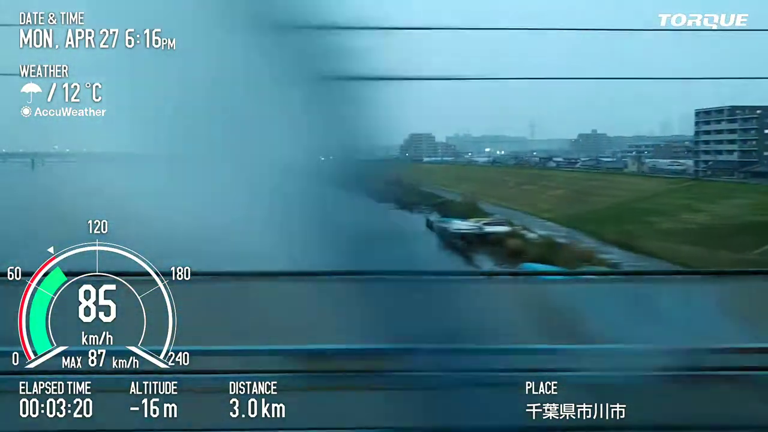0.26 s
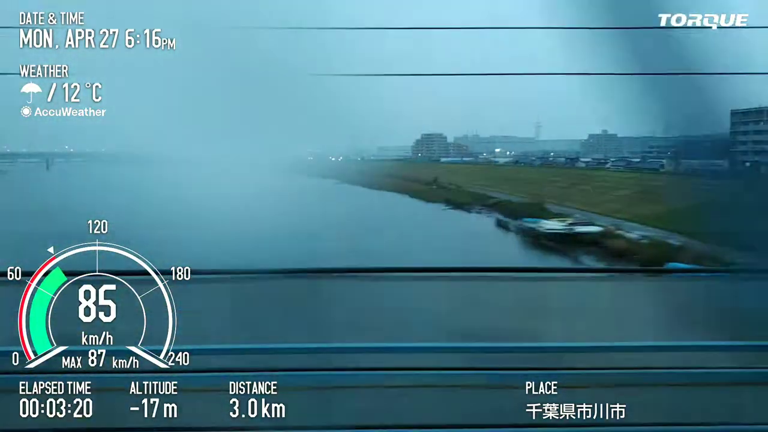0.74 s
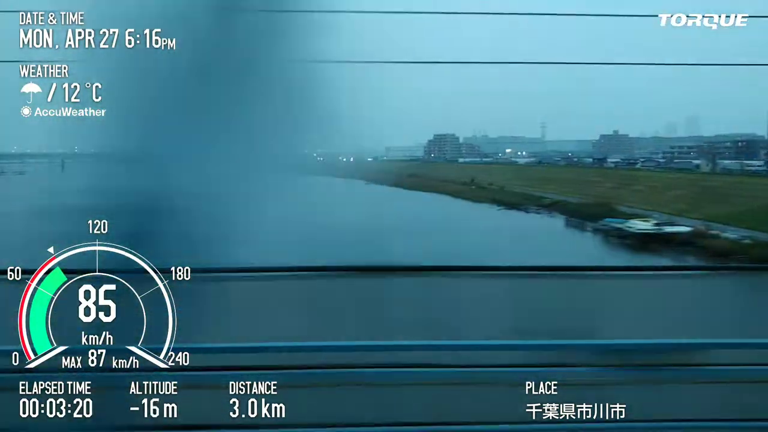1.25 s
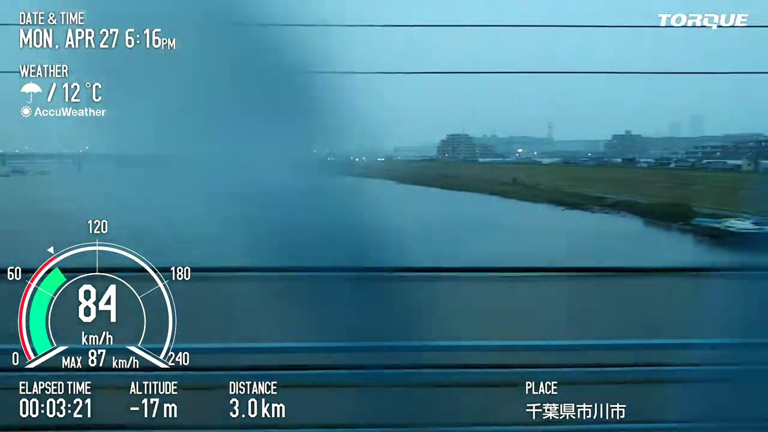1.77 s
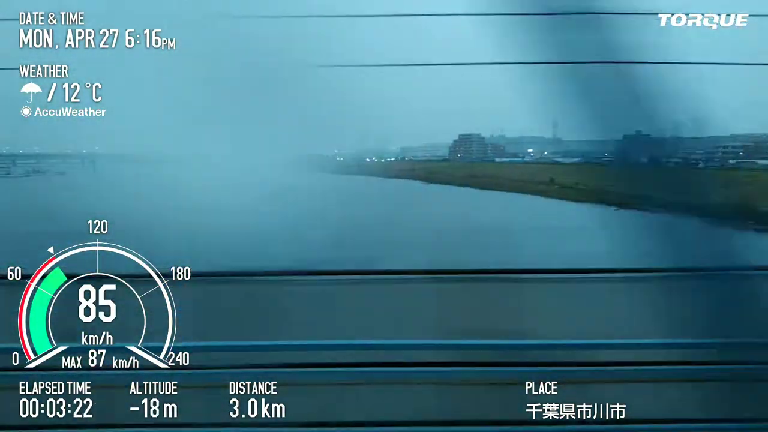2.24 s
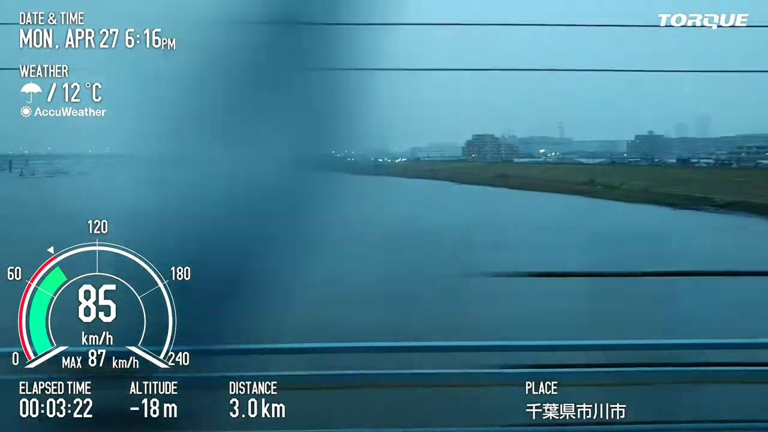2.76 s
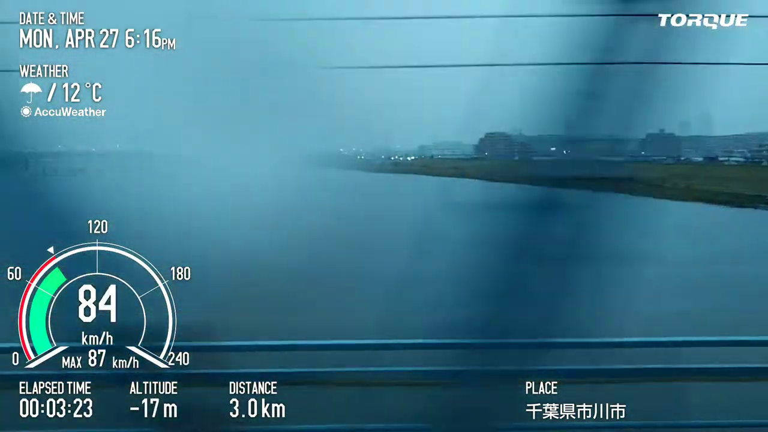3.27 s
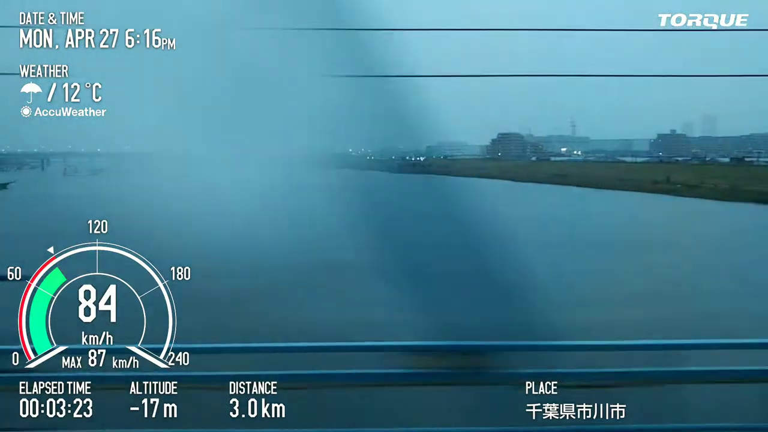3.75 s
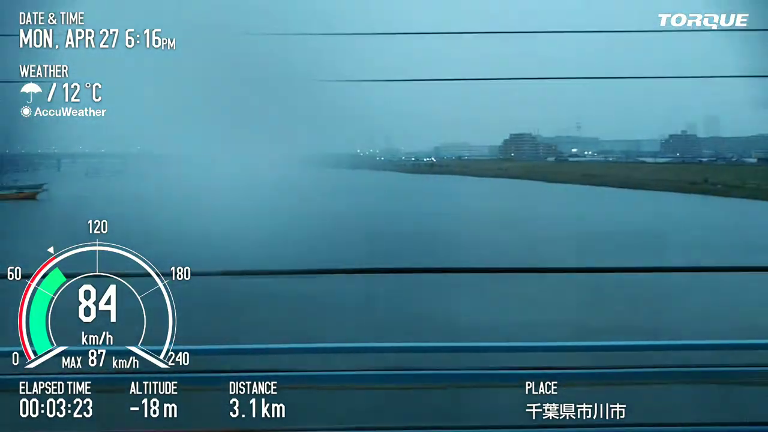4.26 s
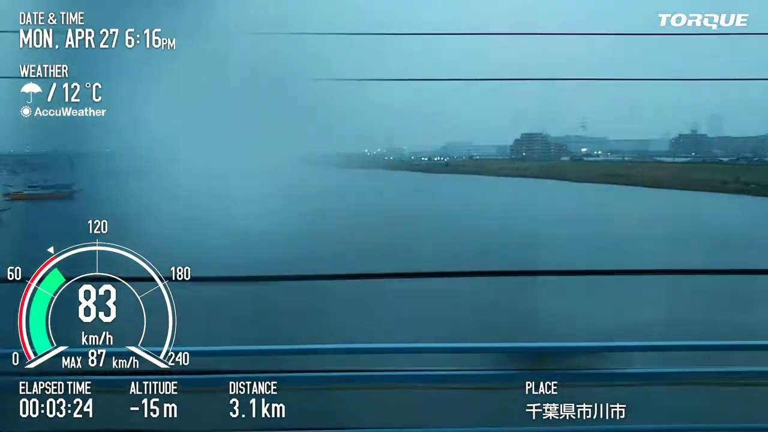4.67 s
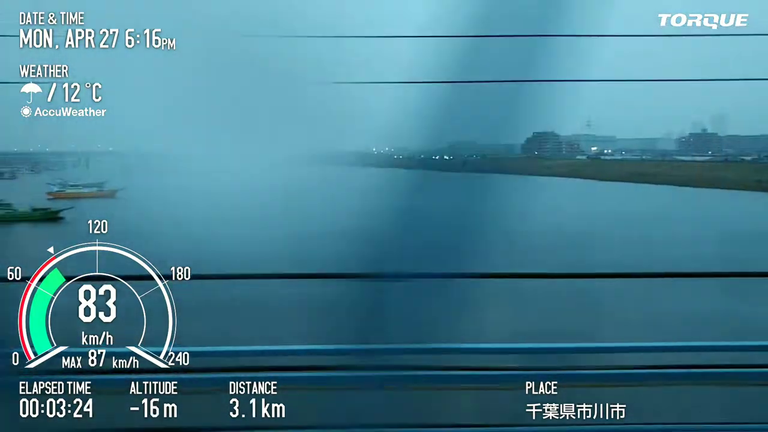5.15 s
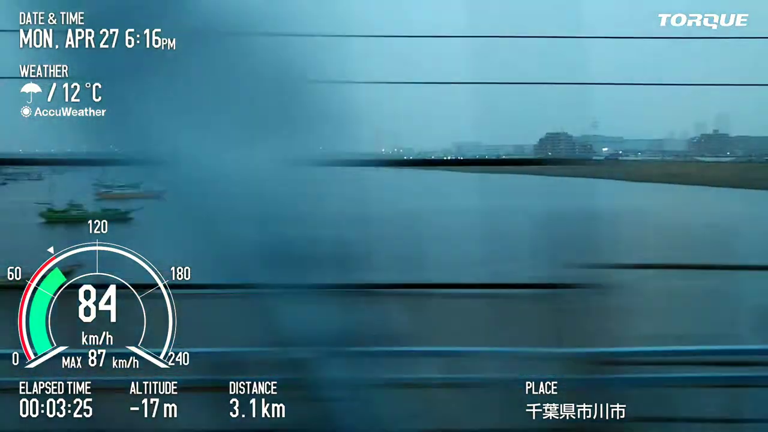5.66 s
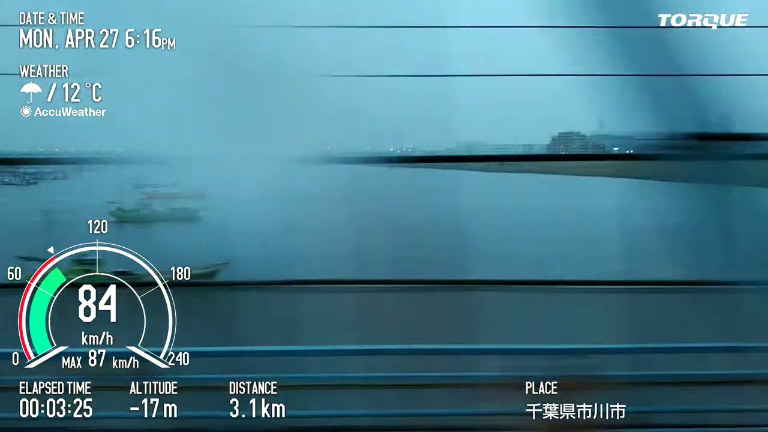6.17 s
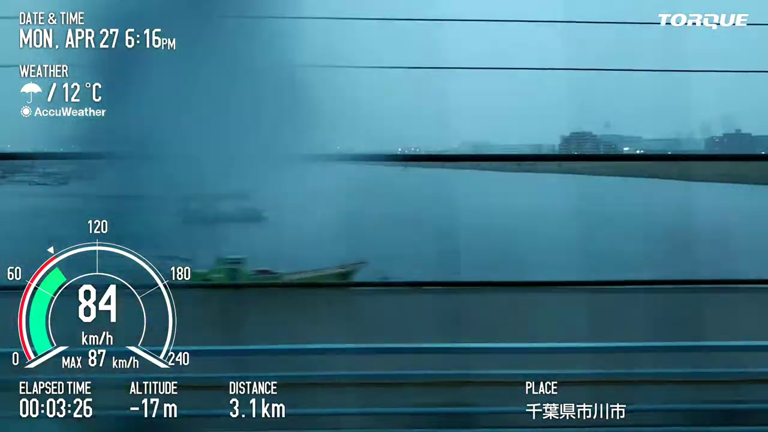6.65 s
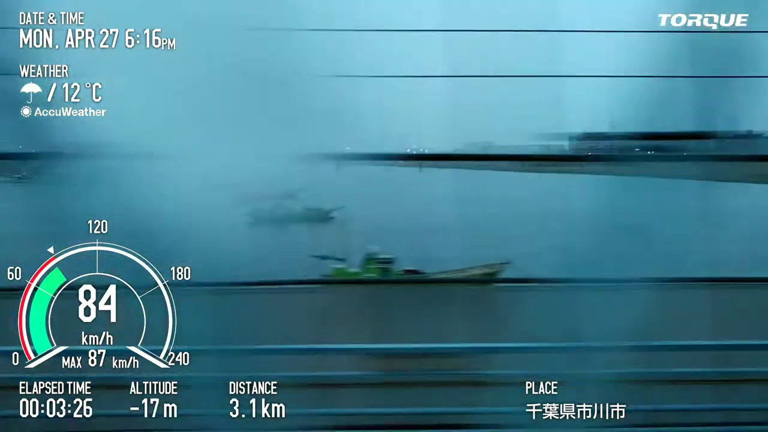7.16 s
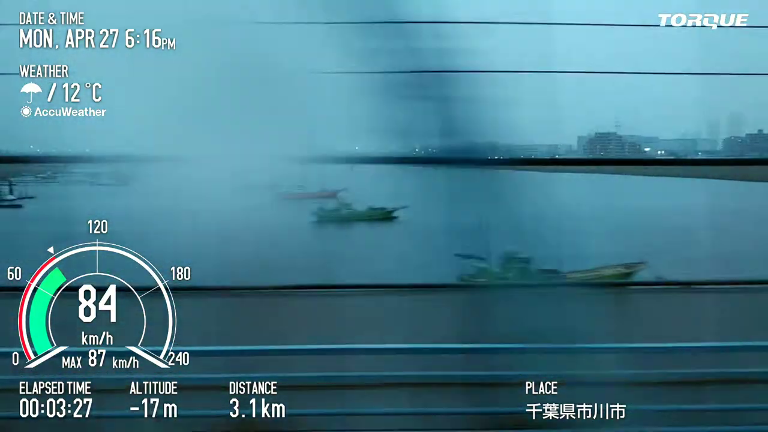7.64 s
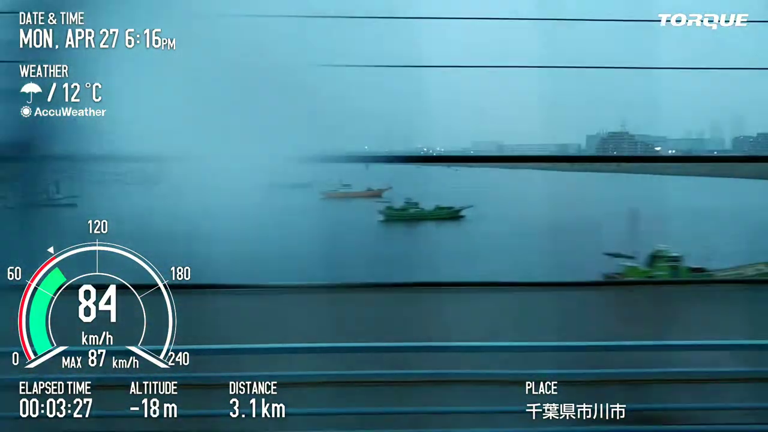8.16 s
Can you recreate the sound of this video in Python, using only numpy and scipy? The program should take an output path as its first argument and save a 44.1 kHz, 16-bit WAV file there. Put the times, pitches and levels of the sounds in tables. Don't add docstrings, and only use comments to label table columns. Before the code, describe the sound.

For about 8.4 seconds, a train crosses a steel bridge at speed, heard inside the carriage from a phone microphone against the window. A loud, boomy low rumble and mid-low floor roar run throughout, with quieter wheel hiss and airy window fizz above. Roughly every 1.07 seconds, a bunch of axle blows clatters over a rail joint, about half a second of overlapping dull knocks and deck thumps, fading back into the roar. Irregular deep air-pressure surges from passing girders distort or momentarily blank the sound, notably near 0.1, 1.2, 2.2, 3.7, 5.5, 6.5, 7.2 and 8.3. Brief, bright trim rattles tick at 0.5, around 1.5-2.4, 2.9, 3.4, 5.3-5.5, 6.4, 7.3 and 8.3. A faint steady gear hum, clearer after 4.8, and a tiny high motor whine sit underneath. Rolling is slightly rougher from 5.5, with knocks densest around 6.4-7.7, continuing to the end.

```python
import sys
import numpy as np
from scipy import signal
from scipy.fft import rfft, irfft, next_fast_len
from scipy.io import wavfile
from scipy.ndimage import uniform_filter1d, map_coordinates

SR = 44100
rng = np.random.default_rng(int(sys.argv[2]) if len(sys.argv) > 2 else 0)


def generate_wav(signal):
    frames = np.transpose(np.atleast_2d(signal))
    scaled = np.clip(frames, -1, 1) * 32767
    pcm = np.round(scaled).astype(np.int16)
    wavfile.write(sys.argv[1], SR, pcm)


def ratio_of_db(decibels):
    return 10 ** (np.asarray(decibels, float) / 20)


N = 370881

# f/Hz, level/dB
DECK_COLOUR = [(60, -59.5), (90, -7), (120, -1), (140, 2), (166, -3.5), (199, -1), (243, -7), (291, -2.5),
               (360, -6), (470, -30.5), (790, -120)]
FLOOR_COLOUR = [(180, -14), (300, -7), (429, -4), (480, -5), (530, -3.5), (600, -3), (680, -7), (902, -7.5),
                (1110, -13.5), (1230, -20.5), (1350, -22.5), (1760, -34.5), (2970, -120)]
WHEEL_COLOUR = [(680, -15.5), (1150, -4.5), (1320, -9.5), (1520, -4.5), (1790, -10), (2030, -9.5),
                (2630, -16), (2870, -16), (4020, -18.5), (5600, -23.5), (7280, -43), (12300, -120)]
WINDOW_COLOUR = [(4060, -23.5), (6900, -9), (9250, -8.5), (11800, 0), (12600, -0.5), (13700, -9)]
BODY_COLOUR = [(10, -38.5), (17, -14), (24, -1.5), (38, -4.5), (49, 0.5), (58, -9), (68, -2.5), (80, -6.5),
               (95, -9.5), (130, -22.5), (170, -39), (290, -120)]
# steady level/dB, front, middle, rear bogie blow/dB, attack/s, t60/s,
# share of track roughness, share of joint boominess
DECK_RESPONSE = (-33.3, -26.6, -29.2, -25.9, 0.0043, 0.8071, 0.7154, .7)
FLOOR_RESPONSE = (-33.9, -25.3, -22.5, -23.2, 0.04, 0.45, 1.2864, -0.55)
WHEEL_RESPONSE = (-46.5, -48, -45, -44, .02, 0.6153, 0.8764, 0.26)
WINDOW_RESPONSE = (-53, -49, -45, -42.5, 0.0242, 0.4832, 0.52, 0.17)
# place/m, front, middle, rear bogie blow/dB
RAIL_JOINTS = [(-0.05, 0.0, -0.023, -1.61), (25, -0.32, 0.33, 0), (50, 1.73, 0.32, 0.36),
               (74.5, 1.03, -0.9, -0.89), (100, -2.04, 0.44, -0.14), (125, 1.12, 0.086, -0.07),
               (150, 0.26, -0.72, 0.51), (175, 0.58, 1.17, 1.13), (200.5, -1.67, -0.0, 0.0)]
# front, middle, rear bogie/dB
JOINT_BOOMINESS = [(0, 0.35, 2.5), (1.63, -1.55, 0.47), (0.95, 1, 1), (-0.11, 0.78, -1), (0.73, .6, -.4),
                   (1, 0.46, -.3), (1.05, -0.84, -1), (-0.38, -1.5, -1.1), (0.87, .1, .1)]
# distance behind first axle/m, second axle over first/dB
BOGIE_LAYOUT = [
    (0, -3),
    (5.3, 2),
    (11.3, 1.01),
]
AXLE_GAP_M, FIRST_BLOW_S, SPEED_M_S = 2.071, -0.35955, 23.44
# t/s, level/dB
TRACK_ROUGHNESS = [(0, 0.5), (1.1, 0.2), (2.2, -0.11), (3.3, -0.61), (4.4, 0.43), (5.4, 1.28), (6.5, 2.5),
                   (7.5, 1.73), (8.41, 1.64)]
# t/s, level/dB
SPAN_BOOM = [(0, 0.45), (1.3, 0.65), (1.6, -2.5), (2.3, -1.13), (3.2, 0.99), (4.4, 2), (4.8, -0.7),
             (6.1, 0.59), (7.4, -1.03), (8.41, 1)]
# t/s, peak level/dB, f/Hz
FLOOR_KNOCKS = [(0.159, -28.6, 301), (0.249, -28.9, 269), (0.968, -31.5, 613), (1.037, -27.1, 387),
                (1.272, -27.0, 333), (1.781, -30.6, 387), (2.0, -31.6, 602), (2.1, -29.0, 290),
                (2.1, -30.8, 376), (2.404, -28.4, 296), (3.153, -28.8, 258), (3.168, -29.7, 511),
                (3.362, -29.9, 360), (3.437, -28.3, 296), (3.916, -27.0, 306), (4.17, -31.6, 608),
                (4.225, -29.0, 355), (4.245, -30.3, 570), (4.385, -29.7, 344), (4.44, -28.8, 290),
                (4.494, -25.9, 366), (4.554, -28.5, 339), (4.973, -29.7, 532), (4.988, -29.7, 328),
                (5.088, -29.2, 333), (5.203, -31.4, 613), (5.313, -24.3, 290), (5.487, -28.0, 285),
                (6.051, -27.5, 312), (6.146, -27.4, 328), (6.28, -33.9, 920), (6.35, -30.1, 737),
                (6.37, -26.8, 538), (6.375, -37.1, 1087), (6.375, -33.9, 947), (6.52, -28.0, 387),
                (6.52, -34.8, 990), (6.55, -27.2, 296), (6.585, -34.0, 785), (6.615, -25.8, 339),
                (6.615, -33.9, 1082), (6.625, -26.6, 629), (6.694, -27.2, 296), (7.133, -30.9, 441),
                (7.333, -28.8, 301), (7.358, -30.1, 538), (7.373, -33.5, 802), (7.383, -33.7, 942),
                (7.433, -30.2, 662), (7.438, -31.1, 538), (7.438, -28.1, 387), (7.448, -30.9, 807),
                (7.463, -27.7, 285), (7.493, -31.2, 554), (7.493, -32.3, 635), (7.617, -31.0, 818),
                (7.637, -28.8, 559), (7.702, -30.9, 662), (7.707, -28.7, 565), (8.201, -29.8, 355)]
# t/s, peak level/dB, f/Hz
DECK_THUMPS = [(0.158, -24.8, 145), (0.228, -26.6, 193), (0.248, -28.5, 139), (0.288, -25.4, 75),
               (0.467, -28.6, 139), (0.687, -28.6, 199), (0.782, -26.1, 145), (0.807, -28.1, 188),
               (1.241, -27.1, 96), (1.286, -30.5, 204), (1.315, -25.6, 86), (1.375, -27.2, 107),
               (2.178, -22.6, 75), (2.298, -27.2, 139), (2.348, -29.6, 193), (2.383, -27.8, 134),
               (3.176, -26.2, 139), (3.291, -26.3, 69), (3.301, -30.7, 188), (3.481, -25.7, 69),
               (4.229, -28.5, 204), (4.259, -26.0, 107), (4.373, -25.1, 199), (4.428, -23.5, 139),
               (4.463, -25.7, 215), (4.523, -25.2, 86), (4.947, -26.6, 150), (5.082, -26.7, 96),
               (5.276, -30.2, 226), (5.281, -28.9, 150), (5.486, -30.5, 242), (5.501, -24.0, 145),
               (5.566, -30.2, 242), (5.586, -26.0, 139), (5.611, -25.9, 69), (6.015, -29.6, 204),
               (6.03, -25.4, 145), (6.12, -28.9, 183), (6.154, -25.1, 69), (6.344, -26.8, 231),
               (6.419, -26.8, 96), (6.588, -26.9, 209), (6.608, -28.4, 156), (6.723, -27.8, 134),
               (7.087, -28.4, 156), (7.142, -24.6, 69), (7.197, -29.0, 188), (7.432, -26.6, 80),
               (7.621, -29.7, 220), (7.626, -26.4, 150), (7.681, -25.4, 69), (7.701, -25.6, 139),
               (7.701, -31.3, 226), (7.781, -26.5, 96), (8.17, -28.1, 123)]
# t/s, level/dB
AIR_PUMPING = [(0, -6), (.6, -21.5), (1.2, -15), (2.2, -9.5), (3.3, -15), (4.3, -17.5), (5.4, -7.5),
               (6.1, -16.5), (6.6, -18.5), (7.2, -17.5), (7.8, -15.5), (8.4, -21.5)]
# t/s,
# pressure/full scale, half length/s
GIRDER_SURGES = [(0, -.15, .012), (.046, .83, .026), (.138, -.785, .023), (.441, .38, .02),
                 (1.136, -.57, .022), (1.228, .745, .03), (1.303, -.44, .024), (1.503, -.56, .025),
                 (1.59, .55, .026), (2.044, -.59, .026), (2.15, .52, .023), (2.211, -.56, .02),
                 (2.306, .66, .022), (2.501, .46, .028), (2.602, -.5, .03), (2.926, .61, .032),
                 (3.425, -.44, .02), (3.671, -.62, .022), (3.741, .71, .017), (4.05, -.48, .02),
                 (4.592, -.53, .02), (4.954, -.56, .023), (5.192, -.46, .034), (5.265, .45, .03),
                 (5.415, -.5, .03), (5.496, .7, .026), (5.697, .61, .018), (6.345, -.5, .017),
                 (6.46, .7, .02), (6.515, -.59, .021), (6.662, .56, .024), (6.728, -.55, .023),
                 (7.094, -.75, .019), (7.231, .58, .03), (7.291, -.72, .023), (7.545, -.42, .019),
                 (8.23, .62, .02), (8.291, -.75, .024), (8.405, .53, .03)]
# t/s, level/dB
BODY_SHAKE = [(0.2, -29), (0.8, -30), (1.3, -30), (1.9, -30.5), (2.16, -26), (2.5, -31), (3.1, -29),
              (3.8, -28.5), (4.5, -28), (5.12, -26.5), (5.4, -30), (5.9, -28), (6.6, -29), (7.2, -28),
              (7.8, -30), (8.3, -30)]
# t/s, peak level/dB
TRIM_RATTLES = [(0.5131, -41.5), (1.4685, -43.5), (1.5528, -41), (1.781, -37), (1.8157, -43.5),
                (2.0062, -43), (2.115, -38.5), (2.2691, -38.5), (2.3141, -44.5), (2.358, -39.5),
                (2.8768, -39), (3.4066, -39), (3.4155, -42), (3.4245, -37.5), (3.437, -40.5),
                (3.452, -42.5), (3.459, -44), (5.2648, -35.5), (5.466, -39.5), (6.3633, -42),
                (6.4662, -43.5), (7.27, -38.5), (8.2766, -43)]
RATTLE_T60_S = 0.0916
CHATTER_PER_S, CHATTER_SCATTER_DB, CHATTER_SHARE = 800, 1.5, 0.455
# t/s, f/Hz, level/dB
GEAR_MESH = [(0, 509, -47), (1.6, 509, -47), (3.2, 508, -43), (4.2, 507, -47), (4.8, 507, -38),
             (5.9, 506.5, -38), (6.5, 506, -43), (6.9, 506, -37), (7.5, 506, -39), (8.1, 506, -35.5),
             (8.41, 506, -42)]
MOTOR_HZ, MOTOR_SAGS_HZ_S, MOTOR_START_DB, MOTOR_FADES_DB_S = 2942, 4, -63.5, .5
# f/Hz, width/Hz, depth/dB
MIC_PORT_DIP = (6400, 450, 2.5)


def unit(x):
    return x / np.sqrt(np.mean(x ** 2) + 1e-20)


def curves(rows):
    s, *cols = np.transpose(rows)
    return [np.interp(np.arange(N) / SR, s, c) for c in cols]


def wobble(rate):
    return map_coordinates(rng.standard_normal(N // 400), [np.arange(N) * rate / SR])


def filtered(x, response):
    m = next_fast_len(N + SR // 2)
    return irfft(rfft(x, m) * response(np.fft.rfftfreq(m, 1 / SR)), m)[:N]


def coloured(x, spectrum):
    f, db = np.transpose(spectrum)
    return unit(filtered(x, lambda hz: ratio_of_db(np.interp(np.log(hz + 1), np.log(f + 1), db))))


def rush(spectrum, patchy_db):
    z = signal.stft(rng.standard_normal(N + 1024), nperseg=1024)[2]
    field = uniform_filter1d(rng.standard_normal(z.shape), size=5, axis=0)
    field = uniform_filter1d(field, size=6, axis=1)
    noise = signal.istft(z * ratio_of_db(patchy_db * unit(field)), nperseg=1024)[1][:N]
    return coloured(noise, spectrum)


def rolling():
    boom_db, roar_db = clatter(DECK_RESPONSE), clatter(FLOOR_RESPONSE)
    hiss_db, fizz_db = clatter(WHEEL_RESPONSE), clatter(WINDOW_RESPONSE)
    jolt = wobble(26)
    deck = ratio_of_db(boom_db + curves(SPAN_BOOM)[0] + 0.4 * jolt - 1.5) * rush(DECK_COLOUR, patchy_db=0.7)
    floor = ratio_of_db(roar_db + 0.4 * jolt - 0.7) * rush(FLOOR_COLOUR, patchy_db=0.8)
    wheel = ratio_of_db(hiss_db + 0.355 * jolt) * rush(WHEEL_COLOUR, patchy_db=1.27)
    pane = rush(WINDOW_COLOUR, patchy_db=1.27)
    dull = filtered(pane, lambda hz: 1 / (1 + (hz / 9800) ** 12))
    calm_db = 0.5904 * fizz_db + 0.3899 * np.mean(fizz_db)
    window = ratio_of_db(fizz_db) * (pane - dull) + ratio_of_db(calm_db) * dull
    window = ratio_of_db(0.57 * jolt + 0.44 * wobble(70)) * window
    return deck + floor + wheel + window


def clatter(response):
    steady_db, *bogie_db, attack_s, t60_s, rough_share, boom_share = response
    step = 64
    t = np.arange(0, N + step, step) / SR
    power = ratio_of_db(2 * steady_db) * np.ones(len(t))
    for (place, *blow_db), boom_db in zip(RAIL_JOINTS, JOINT_BOOMINESS):
        joint_db = blow_db + boom_share * np.array(boom_db)
        for (behind, second_db), part_db, db in zip(BOGIE_LAYOUT, bogie_db, joint_db):
            for gap, axle_db in ((0, 0), (AXLE_GAP_M, second_db)):
                hit_s = FIRST_BLOW_S + (place + behind + gap) / SPEED_M_S
                since = np.maximum(t - hit_s, 0)
                decay = ratio_of_db(2 * (part_db + db + axle_db - 60 * since / t60_s))
                power += decay * (1 - np.exp(-since / attack_s)) ** 2
    level_db = np.interp(np.arange(N) / SR, t, 10 * np.log10(power))
    return level_db + rough_share * curves(TRACK_ROUGHNESS)[0]


def knocks(rows, under_db, attack_s, t60_s, spread, side_db):
    out, t = np.zeros(N + SR), np.arange(SR // 4) / SR
    shape = (1 - np.exp(-t / attack_s)) * ratio_of_db(-60 * t / t60_s)
    side = np.arange(5) > 0
    for (s, db, hz), draw in zip(rows, rng.standard_normal((len(rows), 3, 5))):
        modes_hz = hz * np.exp(spread * draw[0] * side)
        modes = np.sin(2 * np.pi * modes_hz[:, None] * t + 3 * draw[2][:, None])
        ring = ratio_of_db((side_db + 3 * draw[1]) * side) @ modes
        out[round(s * SR):][:len(t)] += ratio_of_db(db - under_db) * shape / shape.max() * ring
    return out[:N]


def girders():
    def sway(hz):
        resonance = 1j * hz * 3.5 / (5.36 ** 2 - hz ** 2 + 1j * hz * 3.62)
        return resonance / (1 + (hz / 15) ** 4) * hz ** 2 / (hz ** 2 + 4)

    swing = unit(filtered(rng.standard_normal(N), sway))
    reach = .38
    pressure = reach * np.tanh(ratio_of_db(curves(AIR_PUMPING)[0] + 12.5) * swing)
    body = ratio_of_db(curves(BODY_SHAKE)[0] + 1.3) * rush(BODY_COLOUR, patchy_db=-0.19)
    step = 16
    t = np.arange(0, N + step, step) / SR
    s, height, half = np.transpose(GIRDER_SURGES)[:, :, None]
    near = ((t - s) / half) ** 2
    hush = np.prod(1 - np.exp(-near ** 2 / 30), axis=0)
    still = np.prod(1 - .35 * (np.abs(height) > .6) * np.exp(-near), axis=0)
    surge = np.sum(height * np.exp(-near / 2), axis=0)
    hush, still, surge = (np.interp(np.arange(N) / SR, t, c) for c in (hush, still, surge))
    air = hush * pressure + surge
    return air - np.mean(air) + still * body


def trim():
    starts = np.zeros(N)
    for s, db in TRIM_RATTLES:
        starts[round(s * SR)] = ratio_of_db(db - 5.5)
    gate = signal.lfilter([1], [1, -ratio_of_db(-60 / RATTLE_T60_S / SR)], starts)
    noise, chance = rng.standard_normal((2, N)), rng.random(N)
    ticks = unit((chance < CHATTER_PER_S / SR) * ratio_of_db(CHATTER_SCATTER_DB * noise[1]))
    chatter = CHATTER_SHARE * ticks + (1 - CHATTER_SHARE) * noise[0]
    knock = gate * chatter + 6 * starts
    ring = filtered(knock, lambda hz: 3.55 * 1j * hz * 1500 / (11600 ** 2 - hz ** 2 + 1j * hz * 1500))
    return ring + ratio_of_db(-6.5) * gate * coloured(noise[1], WHEEL_COLOUR)


def drive():
    gear_hz, gear_db = curves(GEAR_MESH)
    t = np.arange(N) / SR
    gear_level = ratio_of_db(gear_db + 0.59 * wobble(2.93))
    gear = gear_level * np.sin(2 * np.pi * np.cumsum(gear_hz + 0.804 * wobble(5)) / SR)
    motor_level = ratio_of_db(MOTOR_START_DB - MOTOR_FADES_DB_S * t + 1.44 * wobble(12))
    motor_hz = MOTOR_HZ - MOTOR_SAGS_HZ_S * t + 3 * wobble(25)
    motor = motor_level * np.sin(2 * np.pi * np.cumsum(motor_hz) / SR)
    return gear + motor


def thinned(x, share):
    z = signal.stft(x, nperseg=2048, noverlap=1024)[2]
    treble = z[250:446].reshape(14, 14, -1)
    power = np.mean(np.abs(treble) ** 2, axis=1, keepdims=True)
    tilt = ratio_of_db(np.linspace(0, 3.5, 14))[:, None, None]
    power = power / np.mean(power, axis=0) ** .8 * tilt
    power = power * ratio_of_db(5 * uniform_filter1d(rng.standard_normal(power.shape), size=3, axis=2))
    kept = treble * np.where(power < np.quantile(power, share), .04, 1)
    spare = uniform_filter1d(rng.standard_normal(z.shape[1]), size=2) > .95
    z = np.concatenate([z[:250], kept.reshape(196, -1), z[446:644], z[644:652] * spare, 0 * z[652:]])
    return signal.istft(z, nperseg=2048, noverlap=1024)[1][:N]


def scene():
    steady = rolling() + trim() + drive() + girders()
    floor_blows = knocks(FLOOR_KNOCKS, under_db=1.6, attack_s=.012, t60_s=.24, spread=.22, side_db=-9)
    deck_blows = knocks(DECK_THUMPS, under_db=2.2, attack_s=.022, t60_s=.34, spread=.18, side_db=-10)
    return (steady + floor_blows + deck_blows)[None]


def top_cut(x):
    return signal.sosfilt(signal.butter(12, 15800, fs=SR, output="sos"), x)


def record(dry):
    dip_hz, width_hz, depth_db = MIC_PORT_DIP
    top = .707
    early = 1.002 * top
    heard = filtered(dry[0], lambda hz: ratio_of_db(-depth_db * np.exp(-((hz - dip_hz) / width_hz) ** 2)))
    thin = thinned(np.clip(heard, -early, early), share=.07)
    spill = filtered(thin - np.clip(thin, -top, top), lambda hz: 1 / (1 + (hz / 13800) ** 8))
    return top_cut((thin - spill)[None])


dry = scene()
out = record(dry)
generate_wav(out)
```